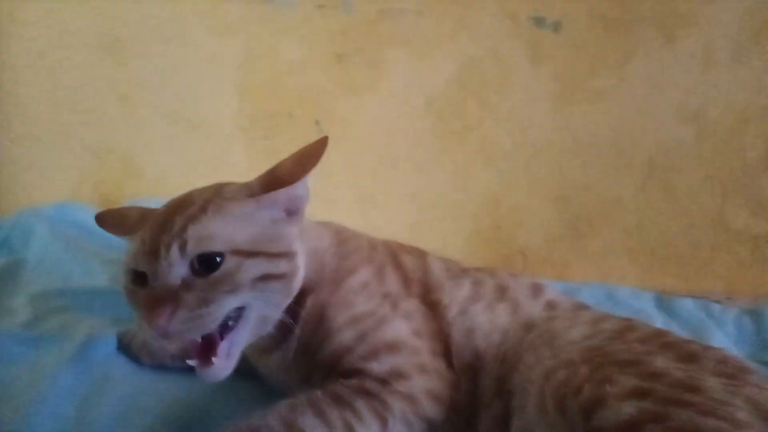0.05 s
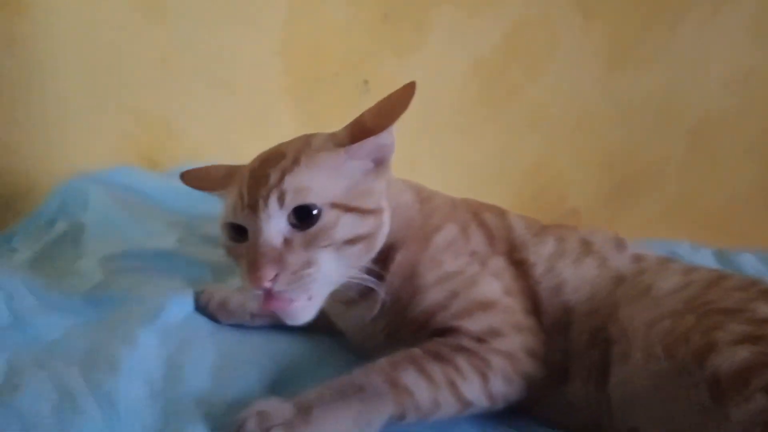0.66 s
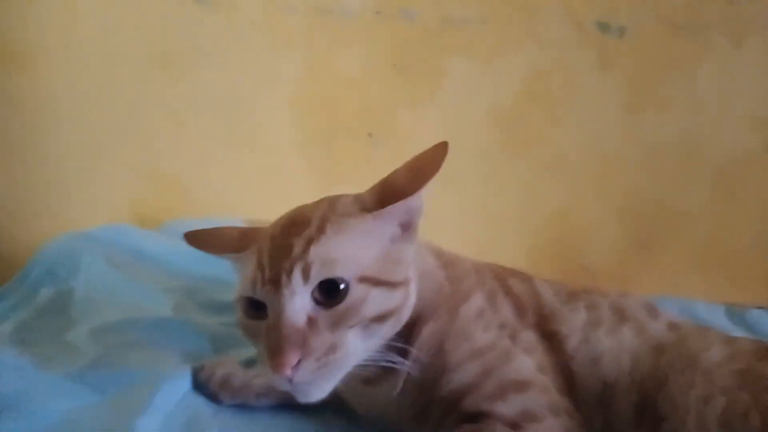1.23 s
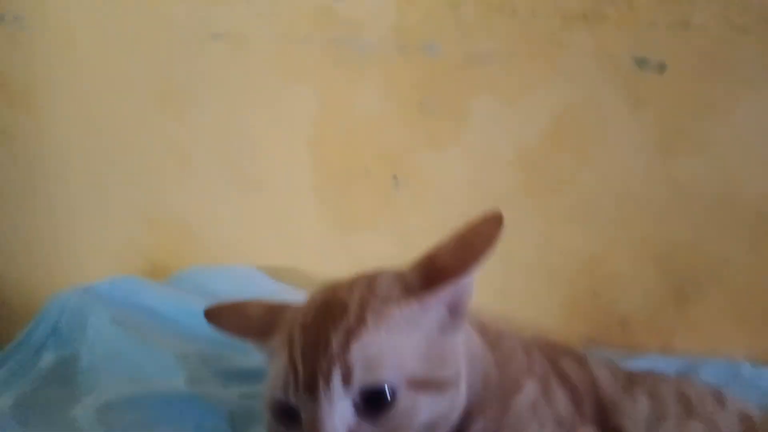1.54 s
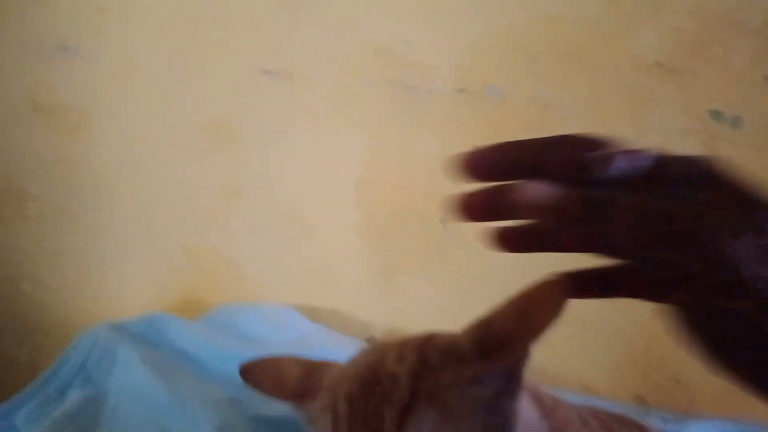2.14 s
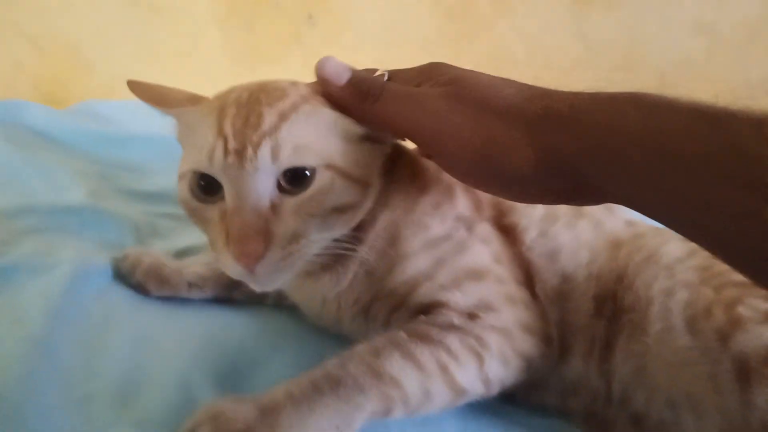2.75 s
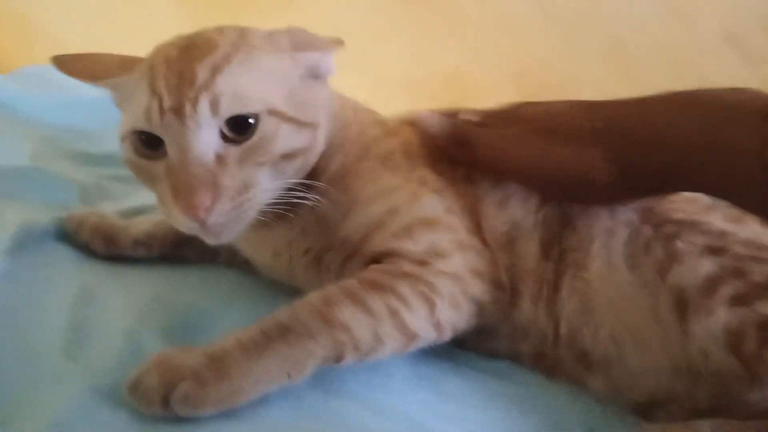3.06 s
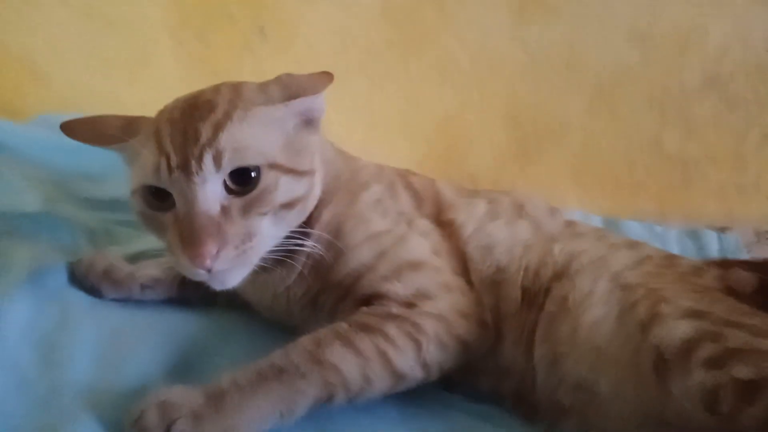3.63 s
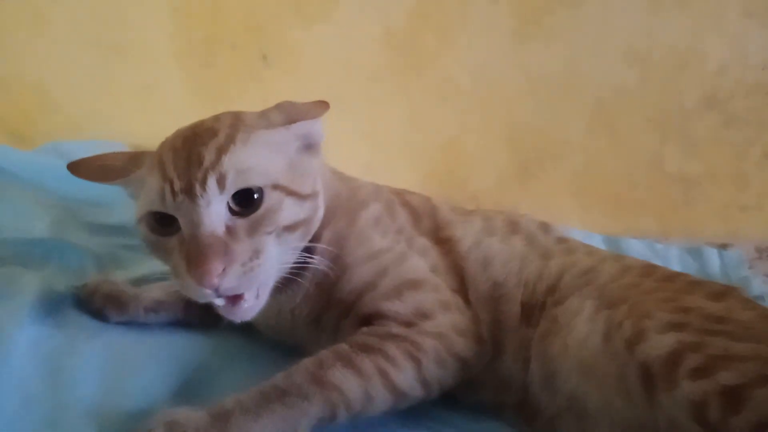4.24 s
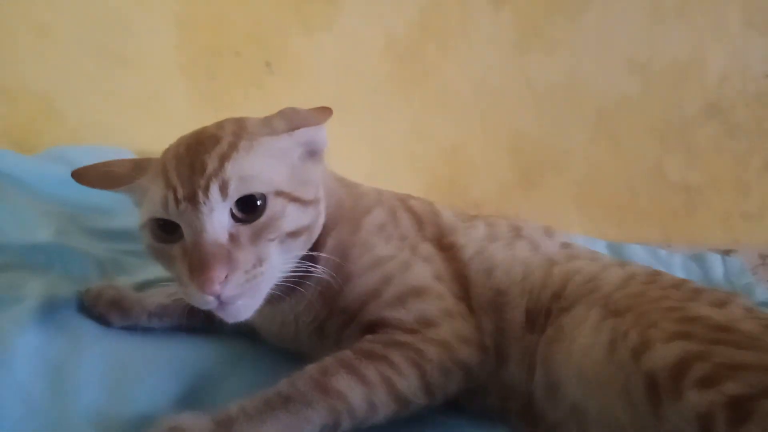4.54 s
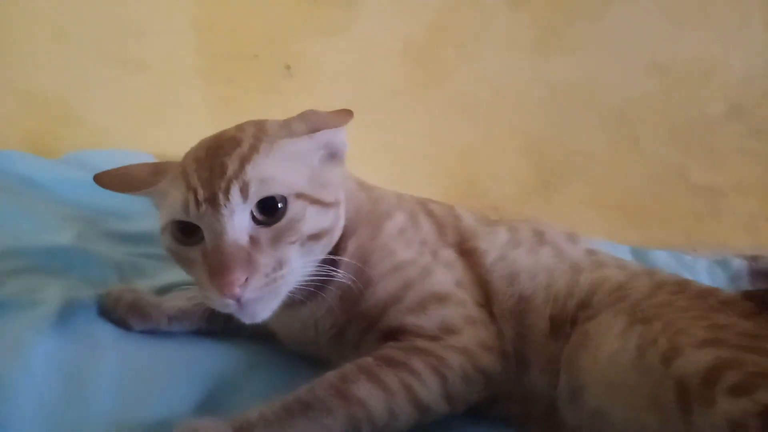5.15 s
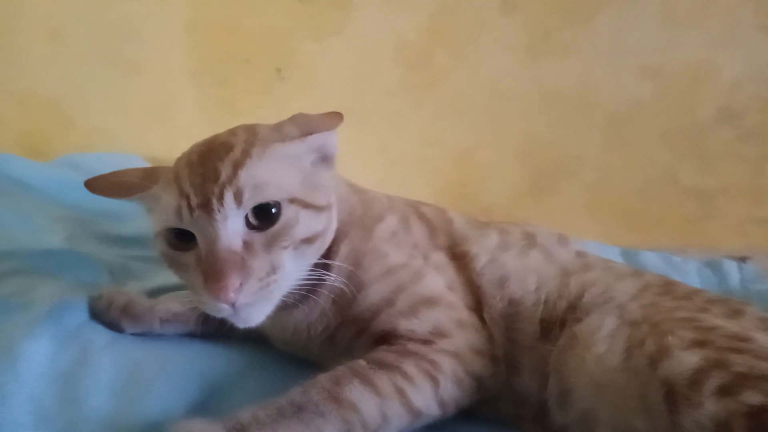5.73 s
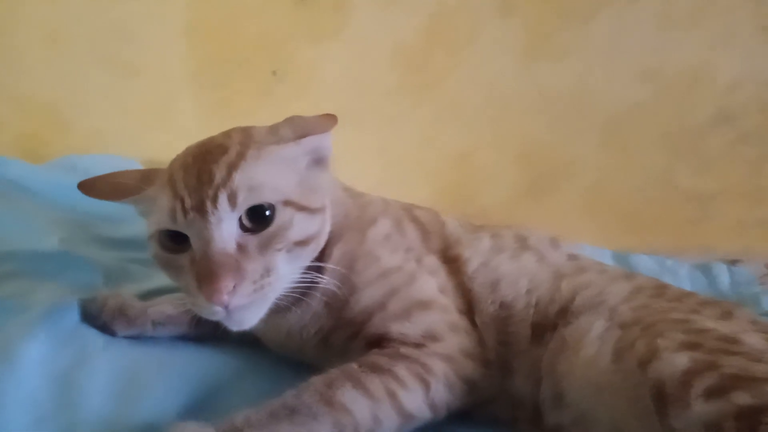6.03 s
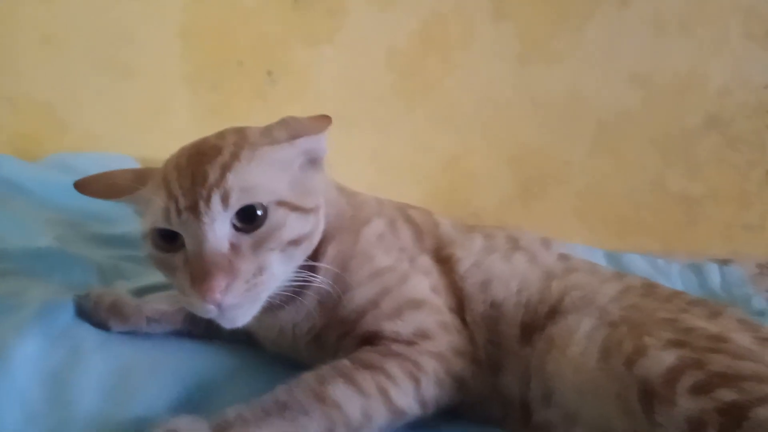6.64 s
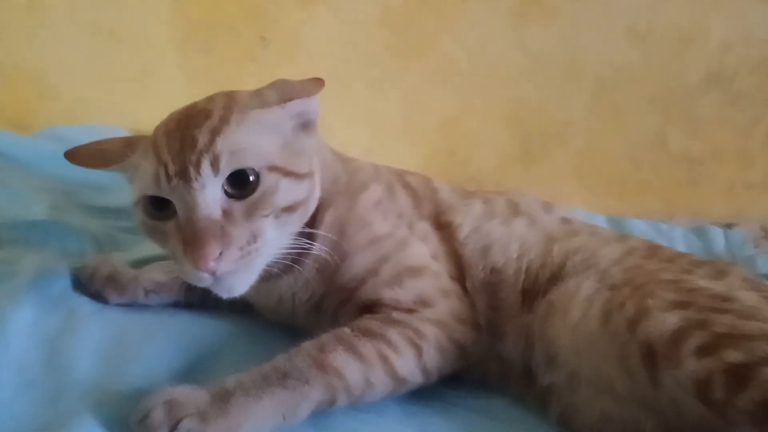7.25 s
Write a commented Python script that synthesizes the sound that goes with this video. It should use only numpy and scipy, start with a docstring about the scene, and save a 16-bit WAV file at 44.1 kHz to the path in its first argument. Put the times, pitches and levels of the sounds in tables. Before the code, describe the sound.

A cat hisses briefly, then later lets out a long yowl that sinks into a fluttering growl in a quiet room.

```python
"""A cat's long yowl sinks into a fluttering growl; before that, the cat hisses and is stroked on a bed.
Its vocal folds buzz and its moving jaw shapes the yowl; a flapping voice box chops the growl into bursts.
The hiss is air rushing through throat and teeth. Close by are mouth clicks, faint squeaks and rustling
fur and bedding. Behind them in the small room are a thin, wavering whine and a mains hum."""
import sys
import numpy as np
from scipy import signal
from scipy.fft import rfft, irfft, next_fast_len
from scipy.io import wavfile
from scipy.ndimage import uniform_filter1d

SR = 44100
rng = np.random.default_rng(int(sys.argv[2]) if len(sys.argv) > 2 else 0)


def transcribe(signal):
    """Save signal, clipped to [-1, 1], as a 16-bit WAV file at the path in sys.argv[1]."""
    frames = np.atleast_2d(signal).T
    limited = np.clip(frames, -1, 1)
    pcm = np.round(limited * 32767).astype(np.int16)
    wavfile.write(sys.argv[1], SR, pcm)


N = 325458
TIME = np.arange(N) / SR

# the tune of the yowl: t/s, f/Hz
YOWL_PITCH = [(3.78, 424.3), (3.85, 439.4), (3.94, 427.9), (4.0, 438.4), (4.08, 462.2), (4.3, 464.7),
              (4.44, 456.9), (4.58, 429), (4.72, 424), (4.83, 409.6), (4.89, 419.6), (4.96, 382),
              (5.02, 313.8), (5.08, 304)]
# where the mouth rings, higher as the jaw opens: t/s, f/Hz
MOUTH_RING = [(3.8, 920), (3.88, 1110), (3.93, 1590), (4.0, 1690), (4.12, 1920), (4.199, 1708),
              (4.26, 1500), (4.335, 1390), (4.38, 1190), (4.46, 1114), (4.54, 1007), (4.63, 683),
              (4.749, 521), (4.869, 400), (4.957, 414), (4.974, 530), (5.019, 476), (5.08, 445)]
# how harsh the yowl is: t/s, roughness/0-1
ROUGHNESS = [(3.789, 0.68), (3.84, 0.49), (3.89, 0.56), (3.94, 0.58), (3.99, 0.4), (4.03, 0.45),
             (4.1, 0.18), (4.3, 0.06), (4.6, 0.12), (4.95, 0.05), (4.98, 0.13), (5.08, 0.31)]
# strength of the lowest tone, the throat's ring and the high ring: t/s, level/dB
YOWL_LEVEL = [(3.8, -54), (3.9, -45.5), (4.08, -46), (4.3, -43.5), (4.48, -42), (4.54, -40), (4.6, -44.5),
              (4.7, -39), (4.77, -37.3), (4.85, -36.5), (4.96, -34), (5.07, -39)]
THROAT_LEVEL = [(3.78, -64.5), (3.84, -56.5), (3.902, -57.5), (4.138, -42.5), (4.263, -58.5), (4.504, -68),
                (4.554, -60.5), (4.702, -72), (4.808, -103), (4.99, -102), (5.033, -71.5), (5.06, -93)]
HIGH_LEVEL = [(3.76, -76), (3.796, -56.5), (3.858, -71), (3.898, -54.5), (4.178, -47), (4.208, -54.5),
              (4.333, -51.5), (4.396, -75.5), (4.608, -65), (4.664, -73.5), (4.708, -64.5), (4.782, -81.5),
              (4.88, -69.5), (4.99, -75), (5.02, -65.5), (5.08, -84.5)]
# tone colour of the low, middle and high parts of the voice: f/Hz, level/dB
LOW_COLOUR = [(300, 2), (460, -2), (700, 2), (850, -3), (930, -4), (1050, -21), (1270, -14), (1390, -14.5),
              (1850, -18), (2300, -15), (3000, -41)]
THROAT_COLOUR = [(1500, -45), (1900, -25.5), (2300, -10), (2600, 6.5), (2820, 8.5), (3000, -10),
                 (3250, -7.5), (3700, -39), (4500, -64)]
HIGH_COLOUR = [(3300, -28.5), (3700, -32), (4150, -21.5), (4650, -11), (5100, -12.5), (5500, -7.5),
               (6000, -2), (6500, 6.5), (6950, 7), (7400, -14.5), (8300, -23), (9300, -43), (11000, -67)]
YOWL_START_S, YOWL_END_S = 3.775, 5.09
RATTLE_START_S, RATTLE_HZ, RATTLE_DEPTH = 4.965, 58, 0.24


def yowl(jitter=0.028, waver=0.006, shimmer=0.45, open_pitch_hz=462, shut_pitch_hz=414):
    """The vocal folds buzz through mouth and throat: harsh as the jaw opens, clear, then rattling."""
    gate = np.clip((TIME - YOWL_START_S) / 0.0033, 0, 1) * np.clip((YOWL_END_S - TIME) / 0.015, 0, 1)
    on = gate > 0
    curves = YOWL_PITCH, MOUTH_RING, ROUGHNESS, YOWL_LEVEL, THROAT_LEVEL, HIGH_LEVEL
    pitch, mouth_hz, rough, low_db, throat_db, high_db = (in_time(curve)[0][on] for curve in curves)
    opening = mouth_hz / mouth_hz.max()
    pitch = pitch * (1 + jitter * rough * drift(140)[on] + waver * drift(60)[on])
    phase = phase_of(pitch)
    k = np.arange(1, 23)[:, None]   # harmonics: tones at 1, 2, 3... times the pitch
    hz = k * pitch
    # each harmonic swells and fades on its own, the upper ones most
    swell = drift(38)
    swells = np.array([np.roll(swell, shift)[on] for shift in rng.integers(0, N, len(k))])
    harmonics = np.sqrt(2) * np.cos(k * phase + k ** 2) * from_db(1.9 * np.log(k + 0.52) * swells)
    # the colour darkens as the voice box drops
    dropped_hz = hz * np.maximum(shut_pitch_hz / pitch, 1) ** 0.64
    low_gain = from_db(at_hz(LOW_COLOUR, dropped_hz))
    vowel = (harmonics * mouth_and_nose(low_gain, hz, mouth_hz, rough)).sum(axis=0)
    throat = evened((harmonics * from_db(at_hz(THROAT_COLOUR, hz))).sum(axis=0), 0.017)
    # the high ring sinks as the throat lengthens, and thins to a whistle as the mouth shuts
    high_hz = hz * (open_pitch_hz / np.maximum(pitch, shut_pitch_hz)) ** 1.11
    thinning = np.clip(1100 / mouth_hz, 1, 2)
    high = evened((harmonics * from_db(at_hz(HIGH_COLOUR, high_hz) * thinning)).sum(axis=0), 0.017)
    puffs = 1 + 0.5 * np.cos(phase)   # air escapes once in every cycle
    voice = 0
    for clean, spectrum, level_db, breath_db in [(vowel, LOW_COLOUR, low_db, -13),
                                                 (throat, THROAT_COLOUR, throat_db, -2),
                                                 (high, HIGH_COLOUR, high_db, 0)]:
        breath = rms_one(band(colour(noise(), spectrum), 6250, 12000))[on] * puffs
        share = from_db(breath_db) * rough * opening
        voice += from_db(level_db) * (clean + share * breath) / np.hypot(1, share)
    # strained folds take turns at strong and weak cycles
    voice *= 1 + 0.1 * rough ** 2 * drift(22)[on] * np.cos(phase / 2)
    voice += rough * opening ** 4 * bared_teeth(harmonics, hz, on)
    rattle = RATTLE_DEPTH * np.sin(2 * np.pi * RATTLE_HZ * np.maximum(TIME[on] - RATTLE_START_S, 0))
    out = np.zeros(N)
    out[on] = voice * (1 + rattle + shimmer * rough * drift(30)[on])
    return out * gate


def mouth_and_nose(gain, hz, mouth_hz, rough, width_hz=135, leak=0.86):
    """The mouth lifts each harmonic it sweeps past; the nose's own ring shows once the mouth shuts."""
    ratio = hz / mouth_hz
    damping = width_hz / mouth_hz + leak * rough ** 2   # leaking folds blunt the ring
    mouth = gain / np.hypot(1 - ratio ** 2, ratio * damping)
    mouth /= np.hypot(1, (ratio / 1.68) ** 3)   # harmonics far above the ring fade
    nose = from_db(-28) * peak(hz, centre_hz=1282, width_hz=110)
    return np.hypot(mouth / mouth[0], nose)


def bared_teeth(harmonics, hz, on, ring_hz=3550, width_hz=850):
    """The voice rings and breath rushes behind the bared teeth."""
    ring = evened((harmonics * peak(hz, ring_hz, width_hz)).sum(axis=0), 0.022)
    breath = from_db(-12) * noise_band(ring_hz, width_hz)[on]
    return from_db(-46) * (ring + breath)


# the grunt that starts the yowl: t/s, f/Hz, level/dB
GRUNT = [(3.742, 427, -50.5), (3.768, 302, -44), (3.785, 339, -35.5), (3.82, 290.5, -43.5),
         (3.91, 280, -68)]


def grunt(jitter=0.0507):
    """The folds start slack and low before they catch the note."""
    pitch, level_db = in_time(GRUNT)
    phase = phase_of(pitch * (1 + jitter * drift(129)))
    tone = np.sin(phase) + from_db(-15) * np.sin(2 * phase) + from_db(-21) * np.sin(3 * phase)
    return np.sqrt(2) * from_db(level_db) * during(GRUNT, 0.0027, 0.01) * tone


# tone colour of the throat with the mouth nearly shut: f/Hz, level/dB
GROWL_COLOUR = [(60, -39.5), (150, -8.5), (200, -4), (240, 3), (300, 2), (720, 1.5), (860, -0.5), (940, -7),
                (1050, -23.5), (1400, -23), (2200, -54.5)]
# rise and fall of the growl's overtones, the tones above its pitch: t/s, level/dB
OVERTONE_LEVEL = [(5.08, -46.5), (5.23, -48), (5.29, -43.5), (5.36, -47.5), (5.45, -57.5), (5.55, -51.5),
                  (5.66, -65.5), (5.9, -58.5), (6.03, -52), (6.26, -53.5), (6.32, -48), (6.39, -52.5),
                  (6.49, -49), (6.68, -58.5), (6.83, -42.5), (7.06, -41.5), (7.15, -49.5), (7.38, -55)]
# the lips part and let the brightest overtones out: t/s, length/s, level/dB
SNARLS = [(5.295, 0.2, -59.5), (5.88, 0.25, -71.5), (6.856, 0.25, -62.5), (7.052, 0.16, -52.5),
          (7.218, 0.2, -63.5)]
GROWL_START_S, LIPS_SHUT_DB = 5.08, -94


def growl(breath_db=-20, chaos_db=-4, overtone_lift_db=0.5, bright_hz=730):
    """Bursts from the voice box pass through the throat and brighten when the lips part."""
    low_db, uneven, burst_flaps = growl_effort()
    gate = np.clip((TIME - GROWL_START_S) / 0.011, 0, 1)
    low, overtones, flow = voice_box_flaps(gate, uneven, burst_flaps)
    overtones = colour(overtones + from_db(breath_db) * flow * noise_band(600, 910), GROWL_COLOUR)
    # where the flapping is most uneven the folds tumble into noise
    low += from_db(chaos_db) * uneven ** 2 * flow * noise_band(390, 200)
    bright = irfft(rfft(overtones) / (1 + (bright_hz / (bins() + 1)) ** 20), N)
    voice = from_db(low_db) * evened(colour(low, GROWL_COLOUR))
    voice += from_db(in_time(OVERTONE_LEVEL)[0] + overtone_lift_db) * evened(overtones - bright)
    voice += (from_db(LIPS_SHUT_DB) + spans_gain(SNARLS, edge_s=0.054)) * evened(bright)
    return gate * (voice + evened(flow) * nose_rasp())


# pushes of breath: t/s, length/s, extra level/dB, extra burst length/flaps
PUSHES = [(5.138, 0.068, 3.5, 0), (5.438, 0.044, 5.5, 0), (5.537, 0.042, 5, 0), (5.682, 0.14, 1.5, 0.059),
          (5.929, .08, 2, 0.043), (6.118, 0.1, 6, 0), (6.534, 0.06, 7.5, 0.3), (6.809, 0.295, 8, 0.42)]
# the folds tumble out of step: t/s, length/s, extra unevenness/0-1
TUMBLES = [(5.138, .11, 0.6), (5.252, .1, .3), (5.351, 0.23, .5), (5.606, 0.12, 0.1), (6.589, 0.1007, 0.6)]


def growl_effort(start_db=-39, sag_db_per_s=5.5, idle_db=-45.5, uneven=0.23, burst_flaps=0.62):
    """The growl weakens to an idle; each push makes it louder and steadier, with longer bursts."""
    level_db = np.maximum(start_db - sag_db_per_s * (TIME - GROWL_START_S), idle_db)
    uneven += sum(extra * held(s, seconds, edge_s=0.047) for s, seconds, extra in TUMBLES)
    for s, seconds, db, flaps in PUSHES:
        push = held(s, seconds, edge_s=0.065)
        level_db += db * push
        burst_flaps += flaps * push
        uneven *= 1 - 0.5 * push
    return level_db, uneven, burst_flaps


# pitch of the folds and pace of the flapping: t/s, f/Hz, flap rate/Hz
GROWL_PITCH = [(5.08, 310, 68), (5.14, 326, 68.3), (5.17, 291, 62), (5.21, 329, 64.3), (5.27, 281, 60.6),
               (5.34, 291, 63), (5.39, 303, 67.3), (5.44, 383, 67.6), (5.54, 379, 62.4), (5.65, 378, 60),
               (5.76, 416.6, 65), (5.9, 411, 70), (6.0, 394.9, 62.3), (6.08, 366, 54.6),
               (6.18, 416.7, 63.6), (6.27, 364, 61.5), (6.33, 358, 64), (6.45, 338.7, 57), (6.5, 316, 60),
               (6.53, 259, 63.3), (6.58, 263, 60.6), (6.63, 348.8, 63.3), (6.68, 310, 67.6),
               (6.74, 261, 63.4), (6.95, 258.5, 61.5), (7.06, 265.7, 63.5), (7.15, 281.5, 64),
               (7.38, 273.4, 63.5)]


def voice_box_flaps(gate, uneven, burst_flaps, stumble=0.22, scatter=0.23, shimmer_db=4, droop=0.061):
    """The voice box flaps some sixty times a second; each flap lets out a short buzz of the folds."""
    pitch, rate = in_time(GROWL_PITCH)
    turns = np.floor(np.cumsum(rate * (1 + stumble * uneven * drift(25.3))) / SR)
    flaps = np.flatnonzero(np.diff(turns) * gate[1:] > 0)
    chances = np.clip(rng.standard_normal((len(flaps), 3)), -2, 2)
    low, overtones, flow = np.zeros((3, N))
    for at, (detune, strength, lateness) in zip(flaps, chances):
        half_s = burst_flaps[at] / rate[at]
        i = np.arange(max(at - int(half_s * SR), 0), min(at + int(half_s * SR), N))
        position = (i - at) / SR / half_s   # -1 to 1 across the burst
        opening = np.cos(np.pi / 2 * position) ** 2
        size = from_db(shimmer_db * uneven[at] * strength)
        # the pitch arches up with the pressure and droops as the air runs out
        arch = 1 + 0.16 * (opening - 0.85) - droop * position
        phase = phase_of(pitch[at] * (1 + scatter * uneven[at] * detune) * arch)
        phase = phase - phase[at - i[0]] + uneven[at] * lateness
        puff = size * opening ** 0.44
        low[i] += size * opening * np.sin(phase)
        overtones[i] += puff * (np.sin(2 * phase) + from_db(-3) * np.cos(3 * phase))
        flow[i] += puff
    return low, overtones, flow


# snorts in the growl: t/s, length/s, level/dB
SNORTS = [(5.27, 0.11, -64), (5.39, 0.22, -80), (6.85, 0.22, -79.5)]
# where the nose and the snorts ring: f/Hz, width/Hz, level/dB
NOSE_RINGS = [(1230, 510, -9), (2514, 90, -5.5), (3900, 810, -12.5), (6120, 340, 1.5), (6480, 250, -4)]
SNORT_RINGS = [(2557, 110, 8.5), (4060, 460, 2), (4900, 130, -7), (6030, 460, 2), (7400, 270, -11)]


def nose_rasp(start_db=-78.5, rise_db_per_s=2.5):
    """Air rasps through the nose, slowly getting louder, with a few snorts."""
    level = from_db(start_db + rise_db_per_s * (TIME - GROWL_START_S))
    rasp = level * ringing_noise(NOSE_RINGS, patchy_db=20.5)
    return rasp + spans_gain(SNORTS, edge_s=0.054) * ringing_noise(SNORT_RINGS, patchy_db=4.5)


# a second, lower tone in the growl: t/s, length/s, f/Hz, level/dB
UNDERTONES = [(5.16, 0.11, 258.3, -46.5), (5.437, .18, 280, -49), (5.622, 0.15, 263.8, -50.5)]


def undertone(jitter=0.035, shimmer_db=3):
    """Slack tissue beside the folds shakes at a lower, unsteady pitch and beats against the growl."""
    out = np.zeros(N)
    for s, seconds, hz, db in UNDERTONES:
        level = from_db(db + shimmer_db * drift(45)) * held(s, seconds, edge_s=0.067)
        out += np.sqrt(2) * level * np.sin(phase_of(hz * (1 + jitter * drift(60))))
    return out


# tone colour of air rushing in the throat: f/Hz, level/dB
HISS_COLOUR = [(30, -48), (90, -21), (165, -2.5), (200, -13), (250, 1), (320, -20), (450, 0), (600, -7.5),
               (720, -13), (860, -9), (1100, -34), (2500, -39.5), (4000, -47)]
# where the hissing mouth rings: f/Hz, width/Hz, level/dB
HISS_RINGS = [(3100, 400, -3.5), (3600, 310, -4.5), (4270, 130, -1.5), (4780, 390, -4), (5540, 200, -1.5),
              (6060, 290, -2), (6680, 370, 0.5), (7200, 170, 0.5), (7800, 200, -8.5), (8950, 480, -13.5),
              (9400, 240, -10), (10300, 180, -23)]


def hiss(hold_s=0.094, stop_s=0.25, sag_db_per_s=88, stop_db_per_s=280):
    """Air rushes through the throat and jets past the teeth; it holds, runs low and is cut off."""
    fall_db = sag_db_per_s * np.maximum(TIME - hold_s, 0) + stop_db_per_s * np.maximum(TIME - stop_s, 0)
    throat = from_db(-49) * evened(rms_one(colour(noise(), HISS_COLOUR)))
    teeth = from_db(-60.5) * ringing_noise(HISS_RINGS, patchy_db=4)
    return from_db(-fall_db) * (throat + teeth)


def yowl_hiss(level_db=-63.5, flutter=0.21):
    """Air spills past the bared teeth as the yowl opens."""
    flow = held(start=3.89, seconds=0.14, edge_s=0.073) * (1 + flutter * drift(70))
    return from_db(level_db) * flow * ringing_noise(HISS_RINGS, patchy_db=3.5)


# mouth clicks: t/s, peak level/dB, f/Hz, width/Hz, relative level of the crisp top/dB
MOUTH_CLICKS = [(1.699, -44.5, 4130, 2880, -21), (3.6448, -44, 6400, 2900, -16),
                (3.6442, -49.5, 11160, 1700, -19), (3.654, -47, 15000, 1210, -14),
                (6.6443, -25.5, 5220, 3100, -32)]


def mouth_clicks(snap_s=0.0018, tail_s=0.016, fizz_s=0.051):
    """Wet lips and tongue part with a snap and a short fizz."""
    out, t = np.zeros(N), np.arange(SR // 4) / SR
    decay = from_db(-21) * np.exp(-t / snap_s) + from_db(-46) * np.exp(-t / tail_s)
    for s, db, hz, width_hz, top_db in MOUTH_CLICKS:
        snap = (t == 0) + noise(len(t)) * decay
        fizz = from_db(-58) * noise(len(t)) * t / fizz_s * np.exp(1 - (t / fizz_s) ** 2)
        click = band(snap, hz, width_hz, order=5) + band(from_db(top_db) * snap + fizz, 14000, 4600)
        at = int(s * SR)
        out[at:at + len(t)] += from_db(db) * click / np.abs(click).max()
    return out


# short puffs, whistles and squeaks: t/s, length/s, f/Hz, width/Hz, level/dB
SQUEAKS = [(0.061, 0.058, 3370, 600, -64), (0.15, 0.016, 6900, 400, -74), (0.18, 0.094, 7200, 200, -80),
           (0.192, 0.03, 4700, 200, -80), (0.21, 0.071, 4870, 70, -76), (0.548, 0.035, 7650, 400, -78.5),
           (0.678, 0.14, 618, 34.8, -71.5), (0.725, 0.087, 5150, 300, -71), (1.181, 0.14, 1776, 110, -74),
           (1.454, 0.093, 1776, 110, -70), (2.044, 0.18, 6580, 450, -71), (2.457, 0.24, 1263, 101, -71.5),
           (2.467, 0.083, 2070, 130, -74), (2.478, 0.095, 2980, 200, -80), (2.776, 0.2, 6120, 300, -72.5),
           (2.778, 0.12, 1714, 100, -67.5), (2.796, 0.2, 2100, 160, -77.5),
           (2.858, 0.25, 1329, 34.8, -67.5), (3.151, 0.064, 7830, 408, -71), (3.65, 0.13, 3680, 400, -63.5),
           (4.285, 0.13, 3770, 455, -68), (4.393, 0.071, 5090, 160, -64), (4.51, 0.093, 3340, 410, -67),
           (4.499, 0.07, 6680, 398, -63.5), (4.52, 0.24, 150, 28.9, -62.5),
           (5.572, 0.051, 7940, 454, -65.5), (5.633, 0.11, 3920, 157, -62.5),
           (6.085, 0.082, 4201, 597.6, -73), (6.147, 0.064, 6547, 502.8, -63.5),
           (6.184, 0.088, 2410, 160, -68), (6.54, 0.041, 1660, 90, -71.5),
           (6.862, 0.034, 1667, 69.7, -64.5), (7.206, 0.11, 2720, 334.2, -65),
           (7.236, 0.061, 3543, 297, -72), (7.339, 0.079, 3490, 200.3, -66)]


def squeaks(rise=0.15):
    """Narrow bands of noise swell quickly and die away."""
    out = np.zeros(N)
    for s, seconds, hz, width_hz, db in SQUEAKS:
        i = np.arange(int(s * SR), min(int((s + 2 * seconds) * SR), N))
        age = (i - i[0]) / SR / seconds
        swell = np.minimum(age / rise, 1) * np.exp(-2 * age ** 3)
        whistle = evened(noise_band(hz, width_hz, len(i) + SR // 10))[-len(i):]
        out[i] += from_db(db) * swell * whistle
    return out


# a hand strokes the fur, and the cat shifts on the bedding: t/s, length/s, level/dB
STROKES = [(1.85, 0.54, -81), (2.358, 0.22, -77), (2.796, 0.24, -79.5), (3.17, 0.94, -81)]
SHIFTS = [(0.4, 0.21, -80), (.76, 0.15, -84), (1.2, 0.43, -84)]
# tone colour of rubbed fur and of a rubbed sheet: f/Hz, level/dB
FUR_COLOUR = [(700, -22), (1300, 2), (2000, -9.5), (3400, -5), (5000, -11.5), (6500, -6), (9000, -26),
              (15000, -10)]
SHEET_COLOUR = [(900, -20), (1500, 3), (2500, -2), (3600, 2), (4800, -8), (6400, 0), (8000, -17),
                (12000, -22)]


def rustle(spans, spectrum, catches_per_s=520, ring_s=0.008, slide_db=-3, fibres=4000):
    """Fibres catch and let go, each ringing briefly at its own pitch, over a softer sliding noise."""
    slide = from_db(slide_db) * rms_one(colour(noise(), spectrum))
    t = np.arange(SR // 16) / SR
    ring = t / ring_s * np.exp(-t / ring_s)
    catches = np.zeros(N + len(t))
    for when, pitch, size, chance in rng.random((fibres, 4)):
        if chance * fibres < catches_per_s * N / SR:
            at, hz = int(when * N), 1000 + 7000 * pitch
            strength = from_db(-3 * np.log(size + 0.037))   # many weak, a few strong
            catches[at:at + len(t)] += strength * ring * np.sin(2 * np.pi * hz * t)
    return spans_gain(spans, edge_s=0.047) * rms_one(rms_one(colour(catches[:N], spectrum)) + slide)


# the whine comes and goes: t/s, length/s, level/dB
WHINES = [(0.338, 0.13, -69), (0.85, 0.17, -74.5), (1.191, 0.08, -63.5), (1.47, 1.4, -60.5),
          (2.882, 0.28, -63), (3.209, 0.11, -63), (3.356, 0.24, -66), (3.653, 0.084, -61.5)]


def whine(tone_hz=803, flutter_hz=38, fray_db=12, fray_rise_hz=42.08, trim_db=-1, waver_db=1.5):
    """A thin, steady tone beats against a narrow band of noise around it."""
    fray = held(start=1.82, seconds=0.44, edge_s=0.22)   # the noise swells and rises once
    phase = phase_of(tone_hz + fray_rise_hz * fray)
    flutter = [noise_band(flutter_hz, 0.69 * flutter_hz) for _ in range(2)]
    haze = from_db(-6 + fray_db * fray) * (flutter[0] * np.cos(phase) + flutter[1] * np.sin(phase))
    tone = np.sqrt(2) * np.sin(2 * np.pi * tone_hz * TIME)
    level = spans_gain(WHINES, edge_s=0.06) * from_db(trim_db + waver_db * drift(39))
    return level * evened(tone + haze, 0.58)


# the tones in the hum: f/Hz, level/dB
HUM_TONES = [(150.5, -78.5), (200, -81), (249, -80.5), (301, -81), (500.6, -85), (608, -86)]


def mains_hum(trim_db=-3, waver_db=4.1):
    """Mains electricity hums in a few wavering tones."""
    return sum(np.sqrt(2) * from_db(db + trim_db + waver_db * drift(15))
               * np.sin(2 * np.pi * hz * TIME + 0.5 * drift(0.82)) for hz, db in HUM_TONES)


# tone colour of the still room: f/Hz, level/dB
AIR_COLOUR = [(15, -25), (25, -16.5), (49, -12.5), (136, -3.5), (281, -10), (359, -9.5), (648, -14.5),
              (804, -2), (997, -13.5), (1270, -10.5), (1490, -16.5), (5140, -23), (6550, -24),
              (9050, -27.5), (15500, -26.5)]
# how alike it sounds on the left and right: f/Hz, likeness/0-1
AIR_LIKENESS = [(50, 0.7), (300, 1), (1500, 0.55), (5000, 0), (10000, 0.16)]


def room_air(level_db=-72):
    """Still room noise, a little louder on the left and less alike at the two ears in the treble."""
    alike = np.clip(at_hz(AIR_LIKENESS, bins()), 0, 1)
    mid, side = rfft(colour(noise((2, N)), AIR_COLOUR))
    stereo = irfft(np.sqrt(1 + alike) * mid + np.sqrt(1 - alike) * side * [[1], [-1]], N)
    return from_db(level_db) * rms_one(stereo) * from_db([[1.2], [-1.2]])


def room_echo(x, decay_s=0.35, echo_db=-12):
    """Bare walls add a dense echo, nearly the same on the left and right."""
    t = np.arange(SR // 2) / SR
    shared, own = noise((2, len(t))) * from_db(-60 * t / decay_s) * (t > 0.004)
    tails = (shared + 0.2 * own * np.array([[1], [-1]])) / np.linalg.norm(shared)
    return x + from_db(echo_db) * signal.fftconvolve(x[None], tails, axes=1)[:, :N]


def from_db(db):
    """Turn decibels into a number to multiply by."""
    return 10 ** (np.asarray(db) / 20)


def rms_one(x):
    """Scale the average strength (rms) to 1."""
    return x / np.sqrt(np.mean(x ** 2) + 1e-20)


def evened(x, seconds=0.055):
    """Keep the strength near 1 from moment to moment."""
    return x / np.sqrt(np.abs(uniform_filter1d(x ** 2, max(int(seconds * SR), 1))) + 1e-6)


def phase_of(hz):
    """The running angle of a wave whose pitch changes."""
    return 2 * np.pi * np.cumsum(hz) / SR


def in_time(rows):
    """Join a table's points into one curve for each column after the time."""
    s, *columns = np.transpose(rows)
    return [np.interp(TIME, s, column) for column in columns]


def during(rows, fade_in, fade_out):
    """Fade in at a table's first time and out by its last."""
    return np.clip((TIME - rows[0][0]) / fade_in, 0, 1) * np.clip((rows[-1][0] - TIME) / fade_out, 0, 1)


def held(start, seconds, edge_s):
    """Rise to 1 around the start, hold, and fall after the given length."""
    return np.clip(0.5 + np.minimum(TIME - start, start + seconds - TIME) / edge_s, 0, 1)


def spans_gain(spans, edge_s):
    """A volume curve from rows of start, length and level."""
    return sum(from_db(db) * held(s, seconds, edge_s) for s, seconds, db in spans)


def at_hz(points, hz):
    """Read between a table's frequencies, with octaves evenly spaced."""
    f, value = np.transpose(points)
    return np.interp(np.log(np.maximum(hz, 1)), np.log(f), value)


def bins():
    """The frequencies that make up a full-length sound."""
    return np.arange(N // 2 + 1) * SR / N


def colour(x, points):
    """Turn frequencies up or down by a tone colour table."""
    return irfft(rfft(x) * from_db(at_hz(points, bins())), N)


def peak(hz, centre_hz, width_hz):
    """A hump that is 1 at its centre frequency."""
    return 1 / (1 + (2 * (hz - centre_hz) / width_hz) ** 2)


def band(x, hz, width_hz, order=2):
    """Keep only the frequencies around hz."""
    edges = np.clip([hz - width_hz / 2, hz + width_hz / 2], 10, 0.49 * SR)
    return signal.sosfilt(signal.butter(order, edges, "band", fs=SR, output="sos"), x)


def noise(shape=N):
    """White noise: all frequencies equally strong."""
    return rng.standard_normal(shape)


def noise_band(hz, width_hz, samples=N):
    """Noise around one frequency, at strength 1."""
    return rms_one(band(noise(samples), hz, width_hz))


def ringing_noise(rings, patchy_db):
    """Rushing air rings at several frequencies, each swelling and fading on its own."""
    white = noise((2, N))
    return rms_one(sum(from_db(db + patchy_db * np.tanh(drift(6.5, step=64)))
                       * band(white[k % 2], hz, width) for k, (hz, width, db) in enumerate(rings)))


def drift(rate_hz, step=16):
    """A smooth random wobble of strength about 1."""
    count = next_fast_len(N // step + 2)
    hz = np.arange(count // 2 + 1) * SR / step / count
    slow = rms_one(irfft(rfft(noise(count)) / (1 + (hz / rate_hz) ** 2), count))
    return np.interp(np.arange(N) / step, np.arange(count), slow)


# how much louder the left side is than the right: f/Hz, level/dB
BALANCE = [(100, 4.5), (350, 4.5), (700, 4.5), (1400, 8), (2800, 4.5), (4500, 5.5), (6500, 1),
           (8500, -24.5), (14000, -1.5)]


def scene(bass_cut_hz=110):
    """The cat lies a little to the left; the microphone's sides differ in colour and lose the bass."""
    cat = hiss() + grunt() + yowl() + yowl_hiss() + growl() + undertone() + squeaks() + mouth_clicks()
    rubbing = rustle(STROKES, FUR_COLOUR) + rustle(SHIFTS, SHEET_COLOUR)
    mix = room_echo(cat + rubbing) + whine() + mains_hum()
    mix = signal.sosfilt(signal.butter(2, bass_cut_hz, "high", fs=SR, output="sos"), mix)
    lean = from_db(at_hz(BALANCE, bins()) * np.array([[0.5], [-0.5]]))
    return irfft(rfft(mix) * lean / lean.mean(axis=0), N) + room_air()


def record(dry):
    """The highest treble, above 15600 Hz, is cut off steeply."""
    return signal.sosfilt(signal.ellip(10, 0.1, 70, 15600, fs=SR, output="sos"), dry)


dry = scene()
out = record(dry)
transcribe(out)
```